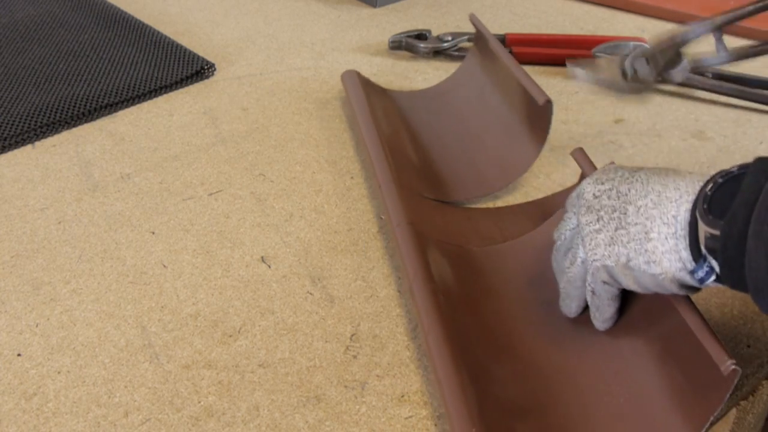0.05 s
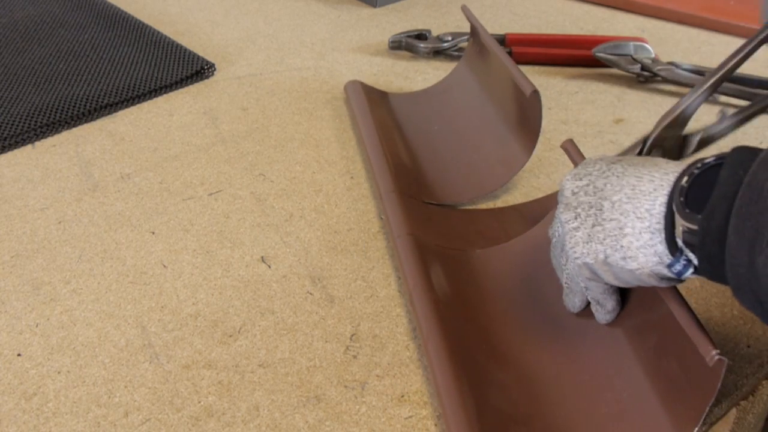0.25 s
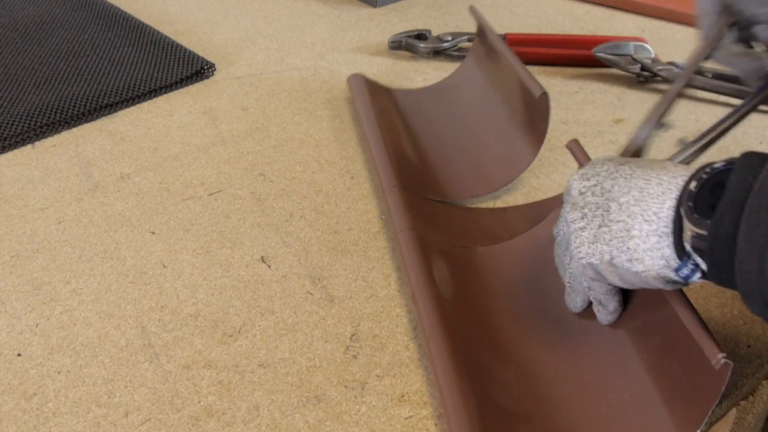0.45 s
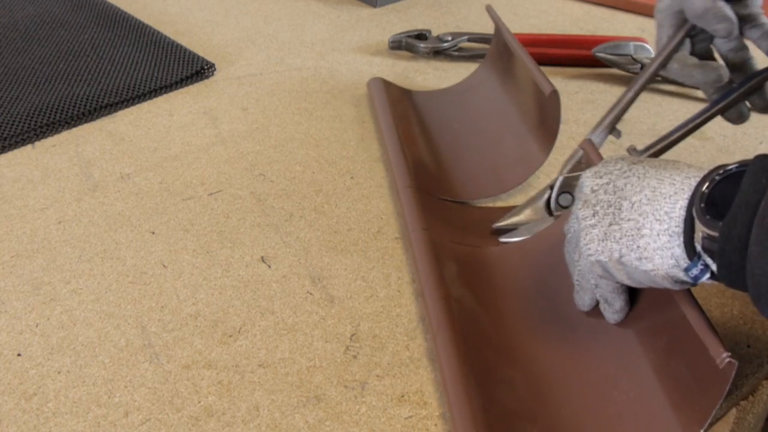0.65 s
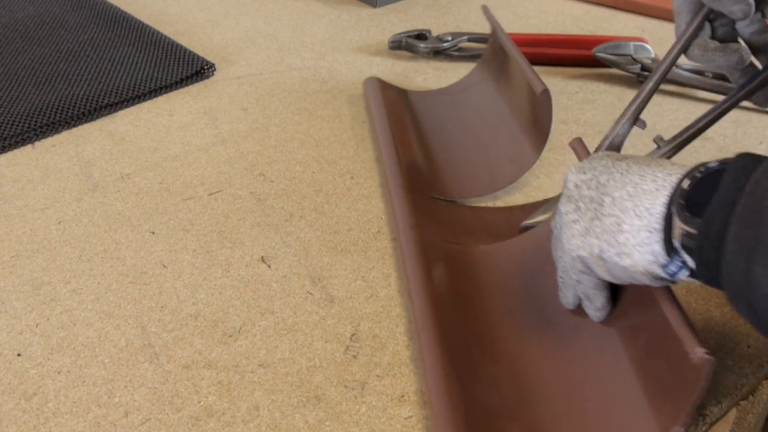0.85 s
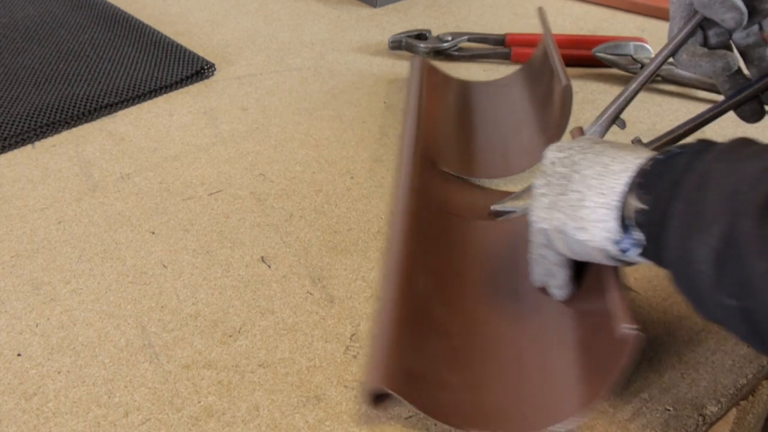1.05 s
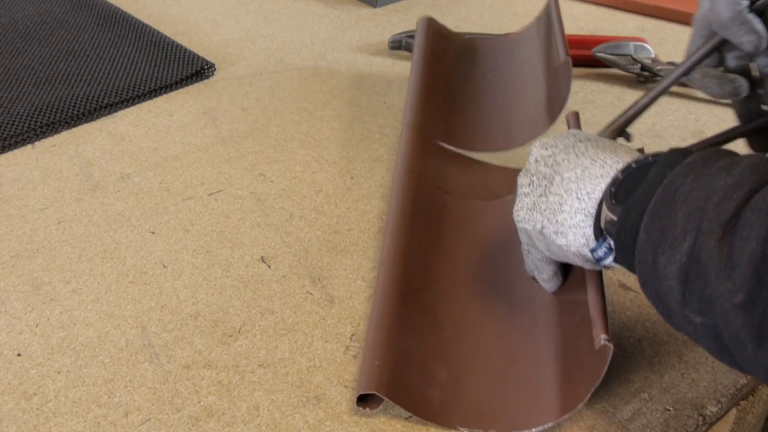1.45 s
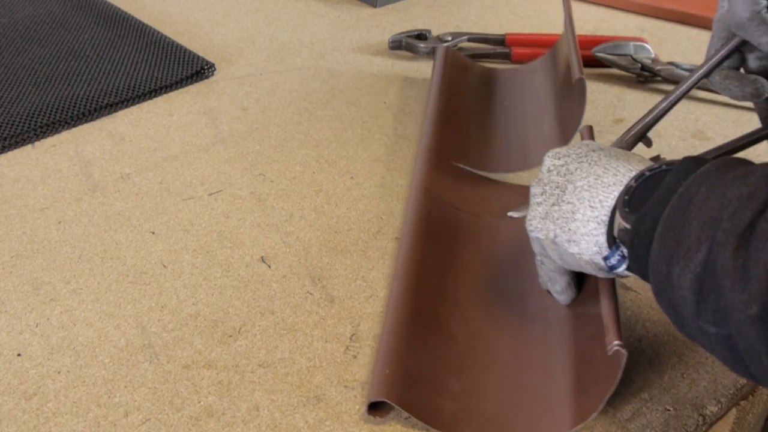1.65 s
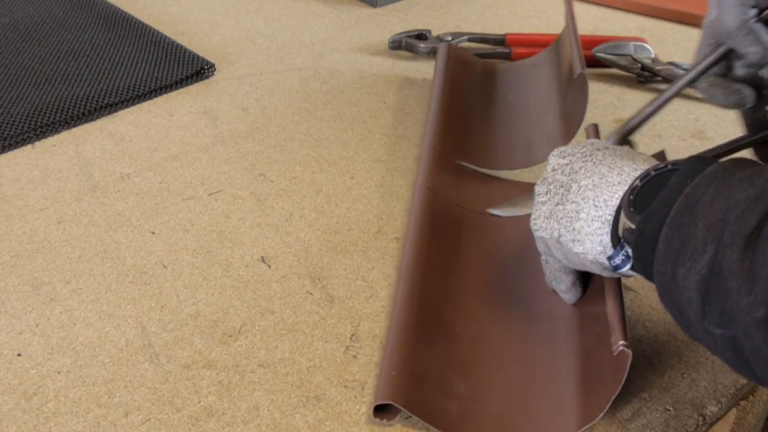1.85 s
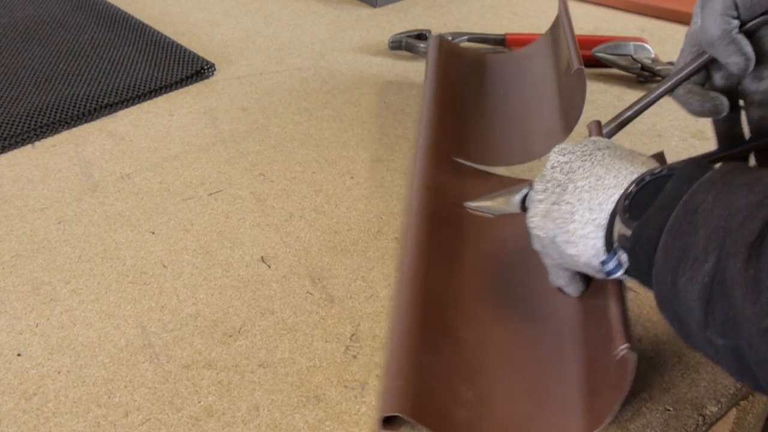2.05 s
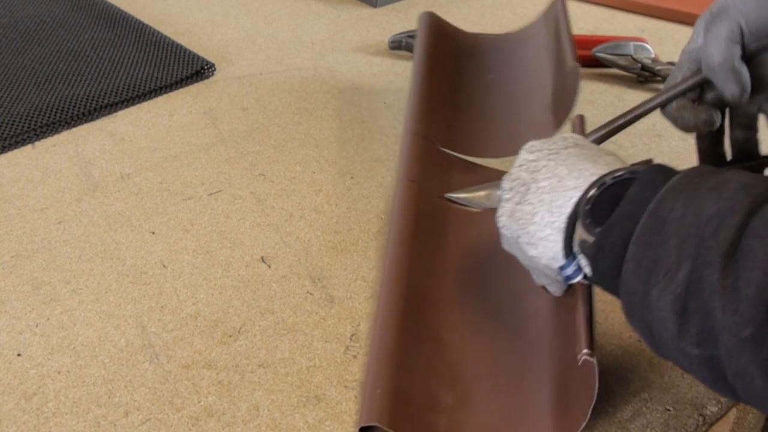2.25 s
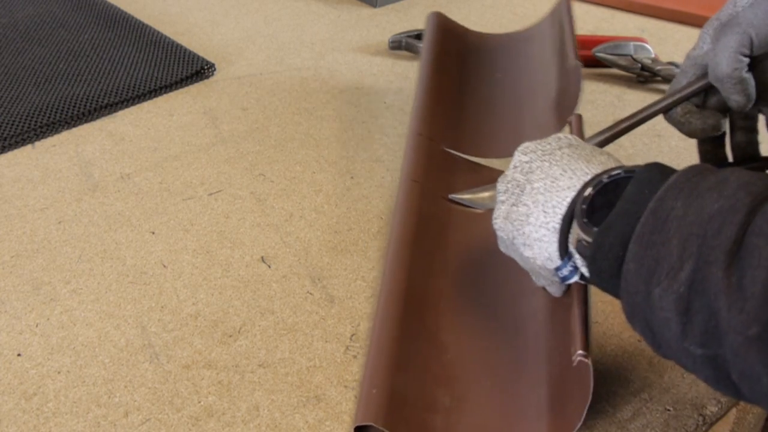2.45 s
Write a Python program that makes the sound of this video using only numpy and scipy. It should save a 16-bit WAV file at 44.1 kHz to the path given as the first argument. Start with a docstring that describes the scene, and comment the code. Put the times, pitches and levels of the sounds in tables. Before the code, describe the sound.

Metal snips cut a sheet-metal gutter, heard close on a wooden bench in a small workshop. After a low sliding rumble, irregular knocks and snaps start at 0.2 seconds, ringing the gutter. The blades scrape and squeal twice around 0.5 seconds. The sheet cracks dryly at 1.3 seconds. Another squeal and a softer crack come near 2 seconds, then a last knock fades into a faint hum.

```python
"""A small workshop, one microphone close to a wooden bench where long snips cut a sheet-metal gutter.
Over a low hum, the gutter slides on the bench with a low rumble. From 0.23 s the blades knock and snap:
each contact chatters, thumps the bench and rings the gutter, the blows ring the snips, the room answers.
The blades scrape from 0.35 s and squeal twice around 0.5 s. The sheet parts with a dry crack at 1.3 s;
a third squeal and a softer crack come near 2 s, and one last knock dies away into the hum."""
import sys
import numpy as np
from scipy import signal
from scipy.fft import rfft, irfft, next_fast_len
from scipy.io import wavfile
from scipy.ndimage import uniform_filter1d

SR = 44100
rng = np.random.default_rng(int(sys.argv[2]) if len(sys.argv) > 2 else 0)


def master_out(mix):
    """Clip the mix to full scale and print it as 16-bit PCM to the path in sys.argv[1]."""
    frames = np.transpose(np.atleast_2d(mix))
    ceiling = np.clip(frames, -1, 1)
    pcm = np.round(ceiling * 32767).astype(np.int16)
    wavfile.write(sys.argv[1], SR, pcm)


N = 110250
IMPULSE_SAMPLES = 4096


def amp(db):
    """Decibels to gain."""
    return 10 ** (np.asarray(db) / 20)


def unit(x):
    """Scale to an energy of 1."""
    return x / np.sqrt(np.sum(x ** 2) + 1e-20)


def along(points, hz):
    """Read a curve of (frequency, value) points on a log frequency axis."""
    freqs, values = np.transpose(points)
    return np.interp(np.log(hz + 0.0011), np.log(freqs), values)


def add(out, start_s, x):
    """Mix x into out from start_s on."""
    i = round(start_s * SR)
    x = x[max(-i, 0):max(len(out) - i, 0)]
    out[max(i, 0):][:len(x)] += x


def filtered(x, response):
    """Filter x by a gain that depends on frequency."""
    size = next_fast_len(N + SR // 2)
    return irfft(rfft(x, size) * response(np.fft.rfftfreq(size, 1 / SR)), size)[:N]


def causal(gain):
    """The minimum-phase frequency response that has this gain."""
    cepstrum = irfft(np.log(gain))
    cepstrum[1:len(cepstrum) // 2] *= 2
    cepstrum[len(cepstrum) // 2 + 1:] = 0
    return np.exp(rfft(cepstrum))


def colour(spectrum, centre_hz=1):
    """A causal pulse of unit energy with the given spectrum."""
    hz = np.fft.rfftfreq(IMPULSE_SAMPLES, 1 / SR)
    return unit(irfft(causal(amp(along(spectrum, hz / centre_hz)))))


def evened(x, width_hz):
    """Flatten the broad colour of a short sound, keeping its fine grain and its attack."""
    spectrum = rfft(x, 2 * len(x))
    width_bins = max(2, int(width_hz * 2 * len(x) / SR))
    power = uniform_filter1d(np.abs(spectrum) ** 2, width_bins)
    flatten = causal(1 / np.sqrt(np.abs(power) + 1e-12))
    return unit(irfft(spectrum * flatten)[:len(x)])


def burst(t60_s):
    """A short dying noise of unit energy."""
    t = np.arange(2 * IMPULSE_SAMPLES) / SR
    return unit(rng.standard_normal(len(t)) * amp(-60 * t / t60_s))


def tone(hz, blur_hz, size):
    """A sine of rms 1 whose phase drifts, widening its line."""
    drift = np.sqrt(2 * np.pi * blur_hz / SR) * rng.standard_normal(size)
    phase = np.cumsum(2 * np.pi * hz / SR + uniform_filter1d(drift, size=200))
    return np.sqrt(2) * np.sin(phase)


def lag(x, time_s):
    """Smooth x with a one-pole lowpass."""
    keep = np.exp(-1 / time_s / SR)
    return signal.lfilter([1 - keep], [1, -keep], x)


# Room tone at the microphone: freq_hz, level_db
ROOM_TONE = [(15, -47), (25, -16), (134, -2.5), (2220, -23.5), (3340, -20), (16000, -48.5)]

def workshop(air_db=-51.5, hum_hz=127, hum_db=-55.5):
    """Steady room tone and a faint hum lie behind the work at the bench."""
    air = filtered(rng.standard_normal(N), lambda hz: amp(along(ROOM_TONE, hz)))
    hum = np.sqrt(2) * np.sin(2 * np.pi * hum_hz * np.arange(N) / SR)
    return amp(air_db) * np.sqrt(N) * unit(air) + amp(hum_db) * hum


def slips(size, per_s=1500, spread_db=3.5):
    """Two surfaces stick and slip: irregular impulses of uneven strength."""
    slipping = rng.random(size) < per_s / SR
    strength = amp(spread_db * rng.standard_normal(size))
    return slipping * strength * rng.choice([-1, 1], size)


# Scrapes of the gutter and the blades: start_s, length_s, thump_db, clang_db, centre_hz, edge_db
SCRAPES = [(-.015, 0.075, -31.5, -42, 880, -55), (0.263, 0.05, -27, -41, 880, -51.5),
           (0.359, 0.075, -29, -26.5, 1470, -25.5), (0.436, 0.064, -37, -36, 1270, -29),
           (.49, 0.13, -38.5, -30.5, 1290, -28.5), (0.547, 0.046, -54, -21.5, 1040, -45),
           (0.64, 0.11, -26.5, -30.5, 1000, -68), (1.357, 0.071, -38, -22, 1500, -27.5),
           (1.462, .12, -37.5, -31, 895, -42.5), (1.841, 0.17, -34.5, -24, 1235, -33.5),
           (1.989, 0.14, -33, -37, 990, -71)]

def scrapes(rise_s=0.0072, fall_s=0.043):
    """Each scrape is a run of slips that swells, holds and lets go; yields (start_s, force, timbre)."""
    t = np.arange(SR // 4) / SR
    for start_s, length_s, *timbre in SCRAPES:
        pressure = np.clip(t / rise_s, 0, 1) * np.clip((length_s - t) / fall_s + .5, 0, 1)
        yield start_s, np.sqrt(length_s * SR) * unit(pressure * slips(len(t))), timbre


def sheet_resonances(depth=1.44, merge_hz=7000):
    """The sheet's crowd of short, sharp resonances at one spot, smoothing out in the high treble."""
    peaks = np.abs(rfft(evened(burst(t60_s=0.038), width_hz=430))) + 1e-3
    hz = np.fft.rfftfreq(2 * IMPULSE_SAMPLES, 1 / SR)
    contrast = depth / (1 + (hz / merge_hz) ** 2)
    return unit(irfft(causal(peaks ** contrast)))


# Thump of the gutter and the bench under it: freq_hz, level_db
THUMP_SPECTRUM = [(20, -38), (45, -3.5), (170, -11.5), (222, 1), (310, .5), (380, -4.5), (480, -6),
                  (800, -23.5), (3000, -72.5)]
# Clang of the sheet around its centre frequency: freq_ratio, level_db
CLANG_SPECTRUM = [(.1, -37), (.4, -11), (1, 2.5), (1.4, -2.5), (2.2, -7), (10, -69)]
# Bright crack of steel on steel at the blade edge: freq_hz, level_db
EDGE_SPECTRUM = [(300, -50), (1200, -3.5), (2200, 4.5), (4300, 0.5), (6200, -4), (7500, -11.5),
                 (11000, -19), (16000, -29)]

def contact(force, thump_db, clang_db, centre_hz, edge_db):
    """A force spreads through the sheet as thump, clang and bright edge."""
    thump = amp(thump_db) * colour(THUMP_SPECTRUM)
    clang = amp(clang_db) * colour(CLANG_SPECTRUM, centre_hz)
    edge = amp(edge_db) * signal.fftconvolve(colour(EDGE_SPECTRUM), sheet_resonances())
    spread = burst(t60_s=0.079)  # the sheet's first fast decay
    spread[0] += 0.31  # the direct impact
    shake = np.linalg.norm(force) * evened(signal.fftconvolve(force, spread), width_hz=290)
    return signal.fftconvolve(shake, thump + clang + edge[:IMPULSE_SAMPLES])


# Reverberation of the small workshop: freq_hz, t60_s
ROOM_DECAY = [(200, 0.54), (900, 0.59), (5000, 0.41), (14000, 0.26)]

def room(sound, tail_db=-7.5):
    """Close to the bench the direct sound leads; a quieter tail follows, its treble dying first."""
    size = SR * 3 // 4
    hz, t, noise = signal.stft(rng.standard_normal(size), SR, nperseg=256)
    decay = amp(-60 * t / along(ROOM_DECAY, hz)[:, None])
    _, tail = signal.istft(noise * decay, SR, nperseg=256)
    response = amp(tail_db) * unit(tail[:size])
    response[0] += 1  # straight path to the microphone
    return signal.fftconvolve(sound, response)


def ring(fed, hz, t60_s, level_db=-6, attack_s=0.00051):
    """A mode stores the energy fed to it and sings it out; a faster decay widens its line."""
    stored = lag(fed, t60_s / (2 * np.log(1000)))
    envelope = lag(np.sqrt(stored), attack_s)
    return amp(level_db) * envelope * tone(hz, blur_hz=1.95 / t60_s, size=N)


# Modes of the gutter, held down on the bench: pitch_hz, gain_db, t60_s
GUTTER_MODES = [(542.7, 8, 0.43), (744.4, 0.5, 0.57), (960, -1, 0.47), (1099, -5, 0.19), (1392, -4.5, 0.21),
                (1516, -1.5, 0.21), (1572, -5.5, 0.61), (2076, -8, 0.43), (2277, -11.5, .2),
                (3146, -7, 0.22)]

def gutter(contacts, reach_octaves=0.22, edge_feed_db=-9.5):
    """Every contact feeds the gutter's modes, most of all those near its clang."""
    out = np.zeros(N)
    for pitch_hz, gain_db, t60_s in GUTTER_MODES:
        fed = np.zeros(N)
        for start_s, force, (_, clang_db, centre_hz, edge_db) in contacts:
            from_clang = amp(clang_db) / (1 + (np.log2(pitch_hz / centre_hz) / reach_octaves) ** 2)
            from_edge = amp(edge_db + edge_feed_db + along(EDGE_SPECTRUM, pitch_hz))
            add(fed, start_s, ((from_clang + from_edge) * force) ** 2)
        out += amp(gain_db) * ring(fed, pitch_hz, t60_s)
    return out


# Knocks and snaps of the snips: start_s, chatter_s, thump_db, clang_db, centre_hz, edge_db
SNIP_BLOWS = [(.233, 0.013, -22.5, -29, 1100, -76), (0.308, 0.04, -26, -23.5, 1540, -19.5),
              (.316, 0.011, -20.5, -19, 1120, -21), (.363, 0.054, -43, -22.5, 1220, -21),
              (.571, 0.011, -37, -30, 970, -21), (.588, 0.0071, -23, -18, 1310, -24),
              (.609, 0.019, -21, -17.5, 1050, -27), (.708, 0.012, -23, -29.5, 970, -37),
              (.744, 0.043, -21, -27, 920, -44), (.888, 0.033, -23, -17, 1284, -23),
              (1.034, 0.087, -44, -18.5, 1197, -29), (1.077, 0.0049, -28, -26, 900, -30.5),
              (1.115, 0.0051, -20.5, -18.5, 960, -35), (1.213, 0.03, -35, -28.5, 950, -39.5),
              (1.307, 0.014, -32, -16, 835, -14), (1.3357, 0.003, -39.5, -18.5, 1540, -14.5),
              (1.412, 0.026, -40.5, -17.5, 755, -25), (1.701, 0.034, -33.5, -27.5, 1010, -48),
              (1.764, 0.071, -34, -29, 1400, -30), (1.785, 0.0093, -41, -13.5, 1290, -15.5),
              (1.795, .012, -39, -18.5, 1250, -18), (1.865, 0.0055, -37, -30, 1270, -22),
              (1.963, 0.01, -34, -22, 481, -25.5), (2.014, .012, -47, -31, 1070, -28.5),
              (2.029, 0.0042, -61, -20.5, 1070, -24.5), (2.054, 0.0067, -30, -23.5, 1220, -21.5),
              (2.217, 0.012, -36.5, -36.5, 920, -51)]

def blows(chatter_db=2):
    """Each blow is one impact and a dying chatter; yields (start_s, force, timbre)."""
    t = np.arange(SR // 4) / SR
    strength = np.sqrt(0.027 * SR)  # the energy of 27 ms at rms 1
    for start_s, chatter_s, *timbre in SNIP_BLOWS:
        force = amp(chatter_db) * unit(slips(len(t)) * np.exp(-t / chatter_s))
        force[0] += 1  # the first impact
        yield start_s, strength * unit(force), timbre


# Modes of the steel blades: pitch_hz, gain_db, t60_s
BLADE_MODES = [(2974, -6.5, 0.083), (4140, -13.5, 0.22), (4900, -23.5, .11), (7200, -22, .12)]

def blades(strikes, spread_db=3):
    """Blows on the edge ring the snips themselves, each mode by a different amount each time."""
    out = np.zeros(N)
    for pitch_hz, gain_db, t60_s in BLADE_MODES:
        fed = np.zeros(N)
        for start_s, force, (*_, edge_db) in strikes:
            share = amp(edge_db + spread_db * rng.standard_normal())
            add(fed, start_s, (share * force) ** 2)
        out += amp(gain_db) * ring(fed, pitch_hz, t60_s)
    return out


# Blades squealing along the sheet: start_s, length_s, glide_s, start_hz, end_hz, level_db
BLADE_SQUEALS = [(0.375, 0.083, .037, 1553, 2340, -35), (0.5, 0.096, .052, 1170, 743, -30),
                 (1.922, .05, .04, 2480, 1800, -32)]

def squeals():
    """A rough tone holds its pitch, then bends as the blade slides off."""
    out = np.zeros(N)
    for start_s, length_s, glide_s, start_hz, end_hz, level_db in BLADE_SQUEALS:
        progress = np.linspace(0, 1, int(length_s * SR))
        bend = np.clip(1 - (1 - progress) * length_s / glide_s, 0, 1)
        pitch_hz = start_hz + (end_hz - start_hz) * bend
        swell = np.sqrt(np.abs(np.sin(np.pi * progress)))
        add(out, start_s, amp(level_db) * swell * tone(pitch_hz, blur_hz=111, size=len(swell)))
    return out


# The sheet parting: start_s, level_db
SHEET_CRACKS = [(1.3365, 3), (2.0535, -4)]

def cracks():
    """One sharp, dry pulse reaches the microphone each time the sheet gives way."""
    out = np.zeros(N)
    for start_s, level_db in SHEET_CRACKS:
        add(out, start_s, amp(level_db) * colour(EDGE_SPECTRUM))
    return out


def scene():
    """Heard from beside the bench: each contact touches a new spot, and all ring the one gutter."""
    strikes = list(blows())
    contacts = strikes + list(scrapes())
    clatter = np.zeros(N)
    for start_s, force, timbre in contacts:
        add(clatter, start_s, room(contact(force, *timbre)))
    cutting = amp(-4.5) * clatter + gutter(contacts) + blades(strikes) + squeals() + cracks()
    return (cutting + workshop())[None]


def record(dry, top_hz=16100):
    """One microphone into a recorder that keeps nothing above its band limit."""
    return filtered(dry[0], lambda hz: hz < top_hz)[None]


dry = scene()
out = record(dry)
master_out(out)
```